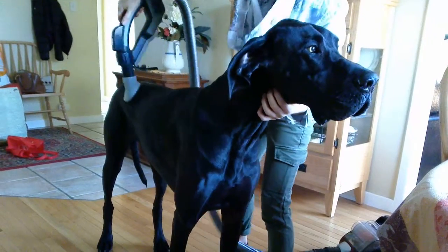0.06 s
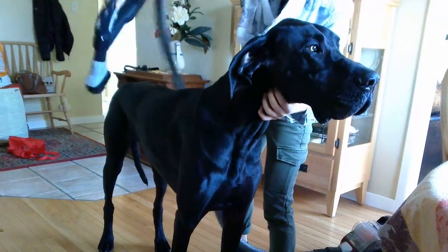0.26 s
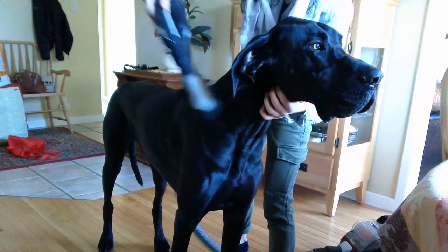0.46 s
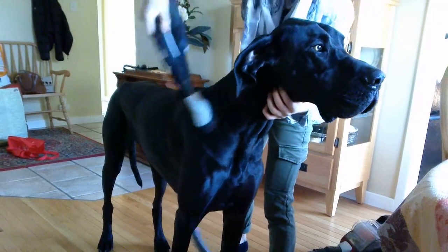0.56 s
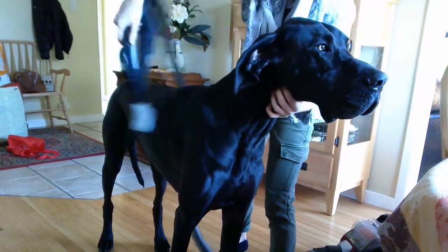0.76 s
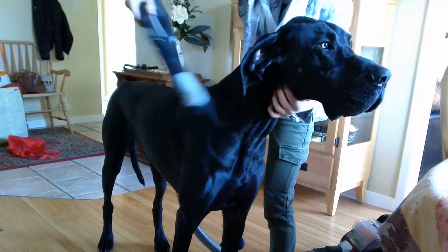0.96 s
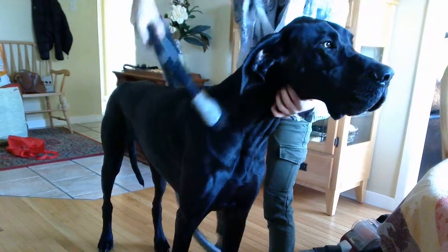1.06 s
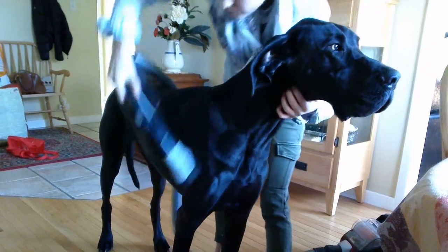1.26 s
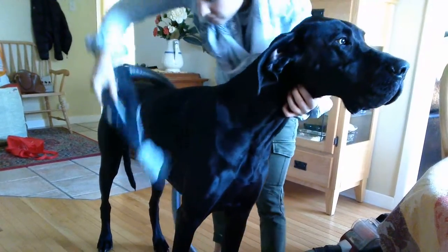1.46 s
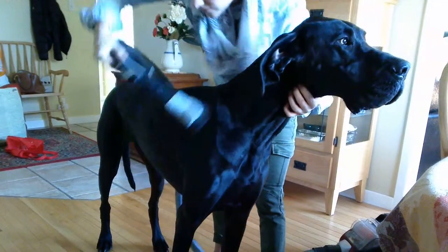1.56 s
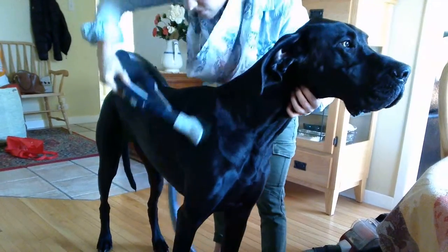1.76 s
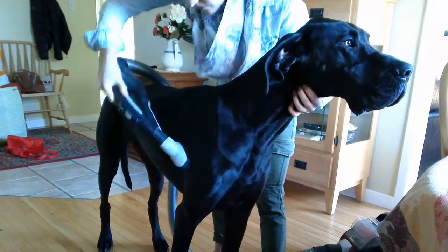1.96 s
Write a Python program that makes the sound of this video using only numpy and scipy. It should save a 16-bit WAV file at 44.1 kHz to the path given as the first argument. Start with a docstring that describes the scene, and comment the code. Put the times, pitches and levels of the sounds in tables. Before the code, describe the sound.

Vacuum cleaner sucking at a dog's fur three times, with a soft hiss between strokes.

```python
"""A vacuum cleaner drones and its open nozzle hisses, then strokes a dog's coat three times.
On the fur the choked air roars through the wand (the stiff tube), and flapping hairs rasp.
The gap between nozzle and coat rumbles as it seals, and hoots briefly where it catches a note.
The rim spits and whistles thinly, the hose throbs, and the living room adds a short tail."""
import sys
import numpy as np
from scipy import signal
from scipy.fft import rfft, irfft
from scipy.io import wavfile
from scipy.ndimage import uniform_filter1d

SR = 44100
rng = np.random.default_rng(int(sys.argv[2]) if len(sys.argv) > 2 else 0)


def generate_wav(sig):
    """Save sig (samples, or channels by samples) to the path in sys.argv[1] as 16-bit PCM at SR."""
    pcm = np.round(np.clip(np.atleast_2d(sig).T, -1, 1) * 32767).astype(np.int16)
    wavfile.write(sys.argv[1], SR, pcm)


N = 88200

# The tone colour of each noise: which pitches are strong (frequency [Hz], relative level [dB])
MOTOR_COLOUR = [(38, -21.5), (58, -38.5), (95, -19.5), (125, -9.5), (150, -13.5), (190, -5.5), (330, -0.5),
                (540, -4.5), (680, -9.5), (1100, -18), (2000, -19), (5000, -39.5)]
HISS_COLOUR = [(900, -18.5), (2000, -14), (2800, -2), (3900, 2.5), (4500, 1.5), (5700, 3), (6200, -0.5),
               (7200, -2)]
SPIT_COLOUR = [(2000, -12.5), (3500, -5.5), (5000, -13.5), (6600, 6), (7300, -3)]
ROAR_COLOUR = [(150, -42.5), (330, -0.5), (530, 0), (750, 4), (1000, -3), (1150, -9.5), (1500, -34),
               (3000, -61.5)]
RASP_COLOUR = [(600, -13.5), (1150, -9.5), (1450, 1), (1900, -7), (2500, -11), (4300, -15.5), (7000, -49)]
RUMBLE_COLOUR = [(30, -47), (58, -61), (78, -37.5), (98, -41), (120, -20), (155, -15.5), (185, -2.5),
                 (300, 6.5), (410, 7.5), (520, -5), (900, -35)]
# Tones of the motor (pitch [Hz], level [dB])
MOTOR_TONES = [(358, -57), (592, -73.5)]
# Air rushing into the nozzle (time [s], level before HISS_DB is added [dB])
HISS_LEVELS = [(0, -57), (.18, -57.5), (.3, -59.5), (.52, -59.5), (.66, -54), (.79, -54), (.87, -63),
               (1.06, -61.5), (1.19, -53.5), (1.3, -56), (1.42, -61.5), (1.68, -64), (1.75, -53.5),
               (2, -56)]
# Air squeezed past the rim as it lands (middle time [s], length [s], level [dB])
SPITS = [(0.221, 0.038, -47.5), (1.305, 0.036, -42.5), (1.345, 0.039, -54)]
# Whistle of the rim (time [s], pitch [Hz], level [dB])
WHISTLE_PATH = [(.17, 3530, -80), (.3, 3547, -60), (.62, 3546, -54.5), (.74, 3950, -56.5), (.88, 3358, -61),
                (1.1, 3560, -56.5), (1.65, 3660, -73.5)]
# Throbs of the sealed hose (middle time [s], length [s], level [dB])
THROBS = [(1.062, 0.22, -69), (1.605, 0.12, -59.5)]
# Notes caught by the gap (middle time [s], length [s], pitch [Hz], glide [octaves/s], level [dB])
HOOTS = [(.215, .02, 3550, -1, -52), (0.224, 0.052, 748, -0.3, -40.5), (0.247, 0.062, 892, 0, -33),
         (0.268, 0.029, 378, 1, -36.5), (.28, 0.1, 203, 0.5, -38.5), (0.342, .04, 382, 1, -34),
         (.385, .06, 890, -1, -40.5), (.41, 0.028, 1810, .5, -41.5), (0.44, 0.055, 350, -5, -37),
         (0.499, 0.028, 690, -2.5, -32), (.553, 0.054, 838, 0, -32), (0.591, 0.017, 340, 0.5, -26.5),
         (0.625, .04, 355, 0, -34), (0.703, 0.024, 252.2, 15, -35.5), (.845, .1, 520, 0, -38),
         (0.854, .07, 1325, 1.5, -39), (.905, .045, 885, -1, -38.5), (0.911, 0.036, 395, -1, -32.5),
         (1.005, .036, 678, -.5, -29.5), (1.01, .022, 345, -1.5, -26), (1.054, .023, 330, -2.5, -30),
         (1.068, 0.031, 685, 2.5, -35), (1.101, 0.021, 290, -8, -31.5), (1.125, .024, 683, -1.5, -25),
         (1.289, 0.057, 766, -.5, -41), (1.344, 0.12, 430, 1.4, -40), (1.373, .09, 1340, 1.5, -41.5),
         (1.478, 0.042, 1990, 0.5, -47), (1.489, 0.14, 480, 0, -37), (1.5, .12, 765, .5, -38.5),
         (1.611, 0.064, 350, 1, -37), (1.703, .09, 690, 0.5, -39)]
# Pitches at which wand and nozzle ring (frequency [Hz], width [Hz], boost [dB])
WAND_RESONANCES = [(206, 19, 6), (375, 67, -1.5), (704, 62, 8), (872, 57, 4.5), (1009, 122, 10.5),
                   (1305, 149, 15), (1772, 220, 6), (2026, 230, 7)]
# Choked air, one list a stroke, before ROAR_DB and RASP_DB are added
# (time [s], roar level [dB], rasp level relative to the roar [dB])
ROAR_STROKES = [
    [(.2, -53.5, -3), (.25, -30, -5.5), (.33, -31, -9), (.39, -31.5, -8), (.465, -36.5, -7),
     (.52, -29, -10.5), (.575, -26.5, -13), (.63, -32.5, -7.5), (.68, -41, -9.5), (.745, -56.5, -6)],
    [(.765, -45.5, -17), (.83, -34.5, -9), (.92, -31, -14.5), (.99, -32.5, -17), (1.05, -31, -10),
     (1.115, -30.5, -7), (1.15, -33, -10.5), (1.24, -46, -13)],
    [(1.31, -46.5, -4.5), (1.39, -33, -11), (1.47, -32, -13.5), (1.55, -35, -4.5), (1.62, -38.5, -14),
     (1.69, -30.5, -8.5), (1.735, -44.5, -6), (1.83, -49, -13)],
]
# The nearly sealed gap, one list a stroke (time [s], level before RUMBLE_DB is added [dB])
RUMBLE_STROKES = [
    [(.2, -60), (.245, -31), (.33, -31), (.44, -30.5), (.55, -31), (.625, -32), (.67, -39), (.75, -52)],
    [(.78, -47), (.86, -39), (.92, -34), (.97, -31.5), (1.02, -32.5), (1.11, -31), (1.16, -37),
     (1.24, -44.5)],
    [(1.27, -54), (1.42, -41.5), (1.52, -41), (1.57, -31.5), (1.69, -34), (1.75, -46), (1.84, -60.5)],
]

ROAR_DB, RASP_DB, RUMBLE_DB, HISS_DB, MOTOR_DB = -2, -0.5, -2.5, 1.5, -50.5
HOSE_ROUND_TRIP_S, HOSE_ECHO_GAIN = .016, 0.35
TOP_HZ = 7220


def undb(db):
    """Turn decibels into a gain to multiply by."""
    return 10 ** (np.asarray(db) / 20)


def unit(x):
    """Scale a signal to an average strength (rms) of 1."""
    return x / np.sqrt(np.mean(np.abs(x) ** 2))


def curve(rows, column=1):
    """Join one column of a table with straight lines over time."""
    rows = np.array(rows)
    return np.interp(np.arange(N) / SR, rows[:, 0], rows[:, column])


def swell(since, length):
    """A quick rise, a hold and a quick fall around time zero."""
    return 1 / (1 + np.abs(2 * since / length) ** 6)


def swells(rows):
    """Add a table of swells into one gain curve."""
    return sum(undb(db) * swell(np.arange(N) / SR - middle, length) for middle, length, db in rows)


def wander(hz):
    """A smooth random wobble of strength 1; more hz makes it faster."""
    f = np.fft.rfftfreq(N, 1 / SR)
    return unit(irfft(rfft(rng.standard_normal(N)) * np.exp(-.5 * (f / hz) ** 2), N))


def sine(hz):
    """A pure tone that follows a changing pitch."""
    return np.sin(2 * np.pi * np.cumsum(hz) / SR)


def colour(x, points, resonances=()):
    """Give a sound a tone colour with ringing peaks on top, at strength 1."""
    f, points = np.fft.rfftfreq(N, 1 / SR) + 1e-3, np.array(points)
    db = np.interp(np.log(f), np.log(points[:, 0]), points[:, 1])
    for hz, width, boost_db in resonances:
        db = db + boost_db / (1 + (2 * (f - hz) / width) ** 2)
    return unit(irfft(rfft(x) * undb(db), N))


def room(x, fade_60_db_s=0.092, tail_db=-11.5):
    """Echoes from walls and wooden floor blur into a short tail."""
    t = np.arange(N // 4) / SR
    tail = rng.standard_normal(len(t)) * undb(-60 * t / fade_60_db_s) * (t > .004)
    return x + undb(tail_db) * signal.fftconvolve(x, tail / np.linalg.norm(tail))[:N]


def motor():
    """The motor makes a steady, noisy drone with two wavering tones."""
    drone = undb(MOTOR_DB) * colour(rng.standard_normal(N), MOTOR_COLOUR)
    for hz, db in MOTOR_TONES:
        tone = sine(hz * (1 + .012 * wander(15)))
        drone += undb(db) * unit(tone * (1 + 0.18 * wander(7.2)))
    return drone


def shimmer(x, depth_db, spacing_hz=140, rate_hz=13):
    """Narrow resonances of the hose come and go, each on its own; the result has strength 1."""
    position = np.fft.rfftfreq(N, 1 / SR) / spacing_hz
    spectrum, out = rfft(x), 0
    for k in range(int(TOP_HZ / spacing_hz) + 2):
        band = irfft(spectrum * np.maximum(1 - np.abs(position - k), 0), N)
        out = out + band * undb(depth_db * wander(rate_hz))
    return unit(out)


def intake():
    """Air hisses into the open nozzle and spits sharply as the rim lands."""
    hiss = shimmer(colour(rng.standard_normal(N), HISS_COLOUR), depth_db=4.2)
    spit = colour(rng.standard_normal(N), SPIT_COLOUR)
    return hiss * undb(HISS_DB + curve(HISS_LEVELS)) + spit * swells(SPITS)


def rim_whistle(width_hz=90):
    """Air whistles thinly at the rim: a narrow band of noise around a sliding pitch."""
    air = wander(width_hz) + 1j * wander(width_hz)
    phase = 2 * np.pi * np.cumsum(curve(WHISTLE_PATH)) / SR
    tone = unit(np.real(air * np.exp(1j * phase)))
    return tone * undb(curve(WHISTLE_PATH, column=2))


def hose_throbs(pitch_hz=78.7):
    """The sealed hose shudders with a deep, unsteady tone."""
    return unit(sine(pitch_hz * (1 + 0.052 * wander(30)))) * swells(THROBS)


def gap_hoots(wobble_hz=50):
    """Short, shaky notes sound where the gap locks on to a resonance."""
    t, out = np.arange(N) / SR, np.zeros(N)
    pitch_sway = 1 + 0.02794 * wander(wobble_hz)
    flutter = unit(1 + 0.41 * wander(wobble_hz))
    for middle, length, hz, glide, db in HOOTS:
        near = np.abs(t - middle) < 2 * length
        since = t[near] - middle
        tone = np.sqrt(2) * sine(hz * 2 ** (glide * since) * pitch_sway[near])
        out[near] += undb(db) * swell(since, length) * flutter[near] * tone
    return out


def turbulence(points, flutter_hz=100, flutter_db=1.8):
    """Fluttering air echoes along the hose and makes the wand ring."""
    air = rng.standard_normal(N) * undb(flutter_db * wander(flutter_hz))
    delay = np.exp(-2j * np.pi * np.fft.rfftfreq(N, 1 / SR) * HOSE_ROUND_TRIP_S)
    echoing = irfft(rfft(air) / (1 - HOSE_ECHO_GAIN * delay), N)
    ringing = colour(echoing, points, WAND_RESONANCES)
    # Even out slow changes in level, so only the fast flutter stays.
    return ringing / np.sqrt(uniform_filter1d(ringing ** 2, size=1100, mode="wrap"))


def drift(x, octaves_per_db=.004):
    """Resonances waver, and sink as the gap seals and the rumble outgrows the roar."""
    opening_db = curve(np.vstack(ROAR_STROKES)) - curve(np.vstack(RUMBLE_STROKES))
    speed = 2 ** (octaves_per_db * opening_db) * (1 + .018 * wander(7))
    return np.interp(np.cumsum(speed), np.arange(N), x, period=N)


def contact(strokes, fade_s=0.022):
    """The gain over all strokes, fading in before the first and out after the last."""
    rows, t = np.vstack(strokes), np.arange(N) / SR
    outside_s = np.maximum(rows[0, 0] - t, 0) + np.maximum(t - rows[-1, 0], 0)
    return undb(curve(rows)) * np.exp(-outside_s / fade_s)


def nozzle_on_fur():
    """Choked air roars, flapping hairs rasp and the nearly sealed gap rumbles."""
    roar = undb(ROAR_DB) * drift(turbulence(ROAR_COLOUR))
    rasp = drift(turbulence(RASP_COLOUR, flutter_hz=300, flutter_db=2))
    rasp_gain = undb(RASP_DB + curve(np.vstack(ROAR_STROKES), column=2))
    rasp = shimmer(rasp, depth_db=4) * rasp_gain
    rumble = undb(RUMBLE_DB) * drift(turbulence(RUMBLE_COLOUR), octaves_per_db=.02)
    return contact(ROAR_STROKES) * (roar + rasp) + contact(RUMBLE_STROKES) * rumble


def scene():
    """Mix one channel: the motor behind, and the nozzle's sounds with their room tail."""
    drone = motor()
    nozzle = nozzle_on_fur() + gap_hoots() + hose_throbs() + intake() + rim_whistle()
    return (drone + room(nozzle))[None]


def record(dry):
    """Cut the treble steeply above TOP_HZ."""
    return signal.sosfilt(signal.ellip(12, .2, 70, TOP_HZ, fs=SR, output="sos"), dry)


dry = scene()
out = record(dry)
generate_wav(out)
```